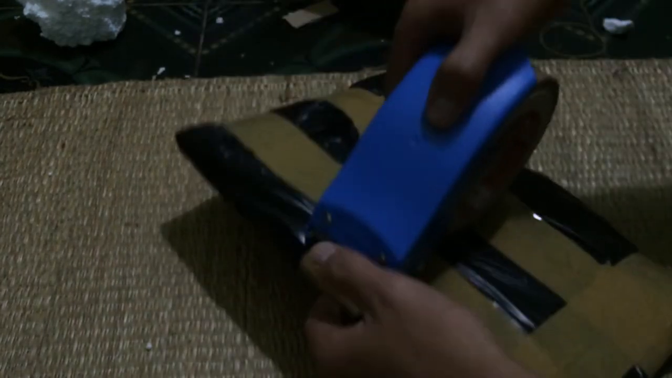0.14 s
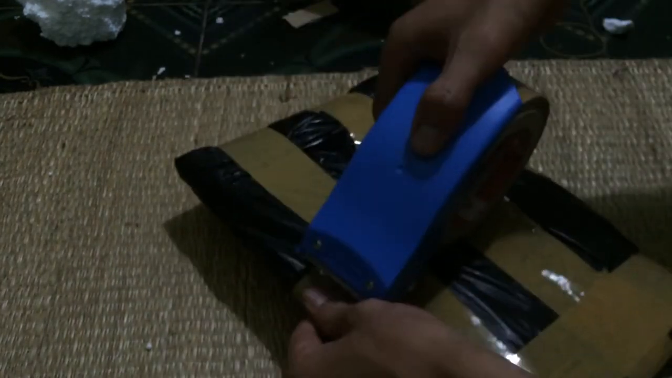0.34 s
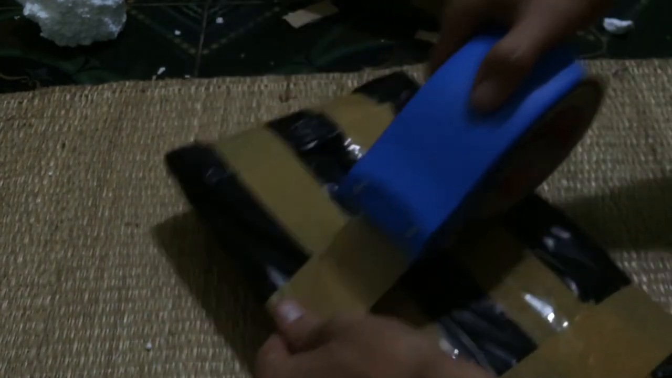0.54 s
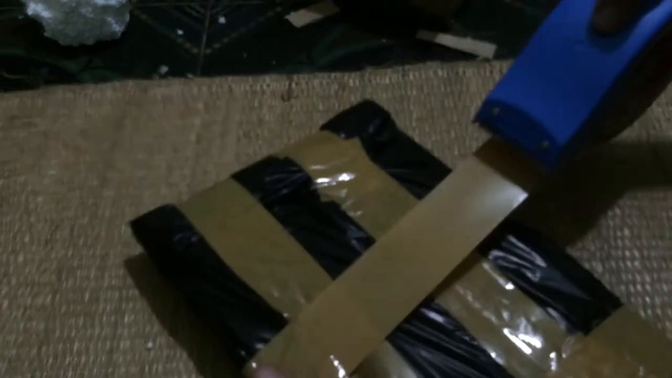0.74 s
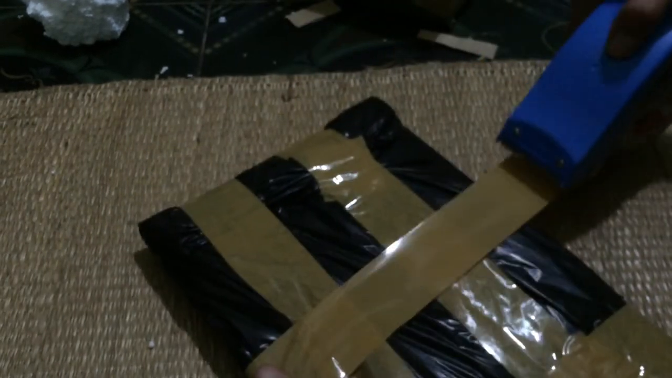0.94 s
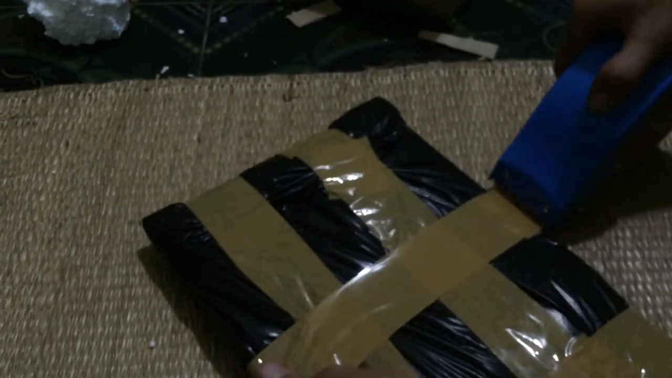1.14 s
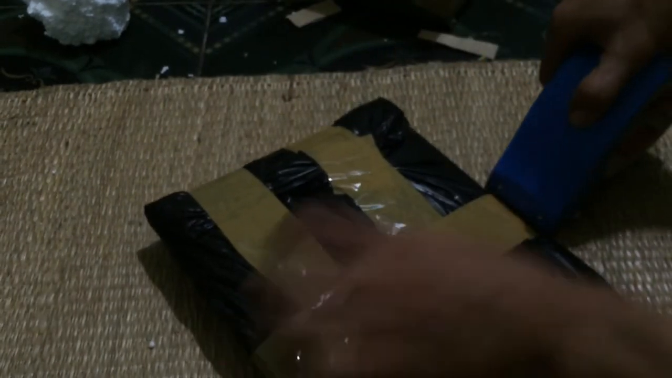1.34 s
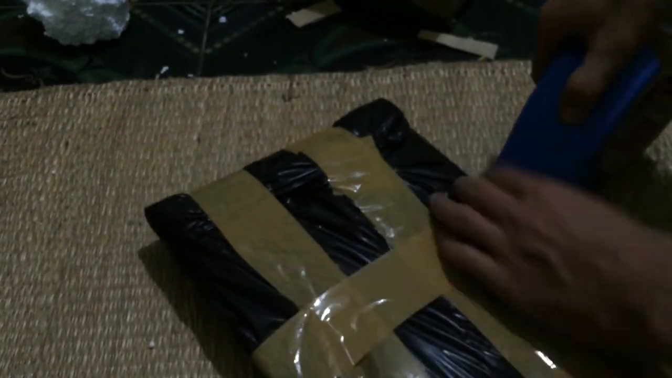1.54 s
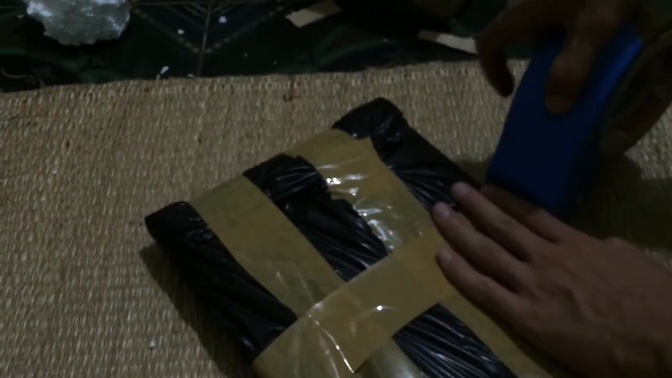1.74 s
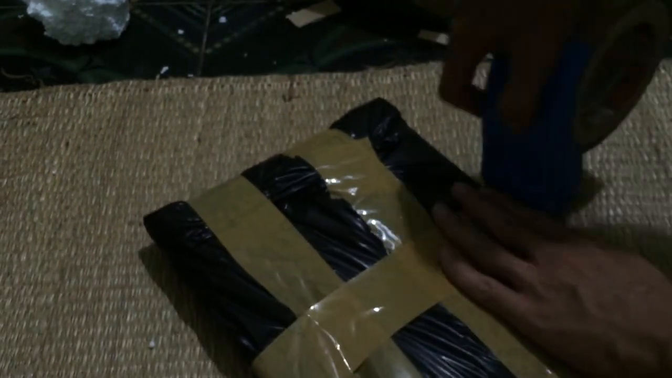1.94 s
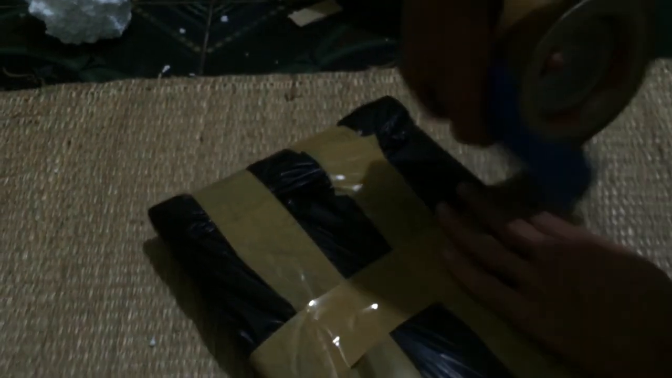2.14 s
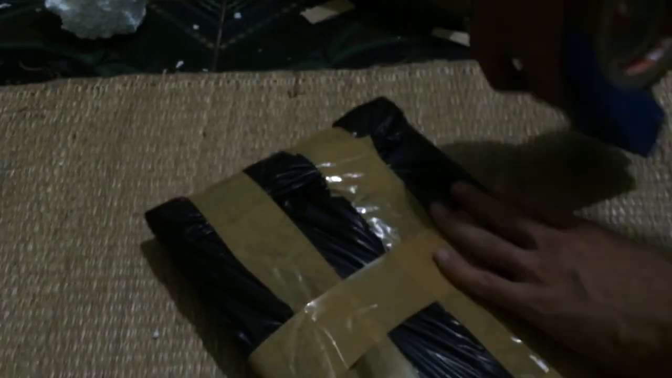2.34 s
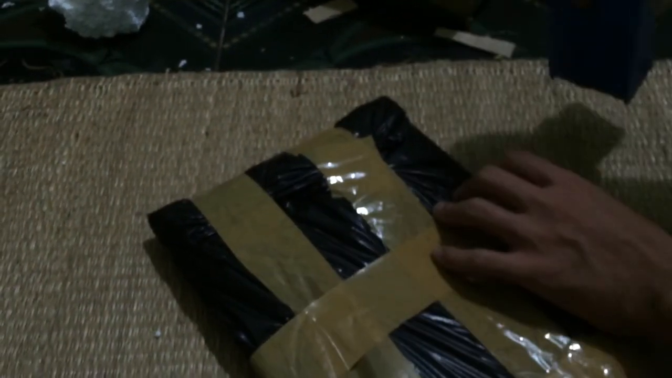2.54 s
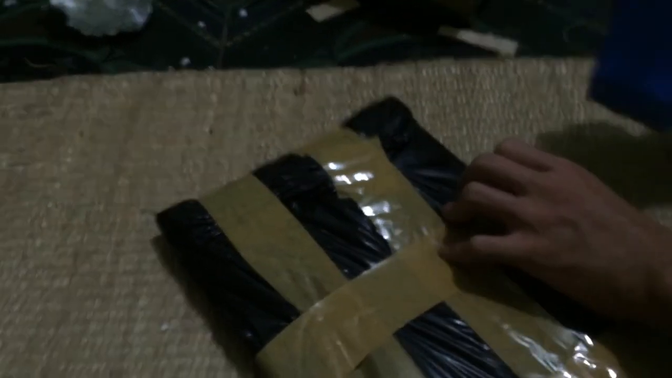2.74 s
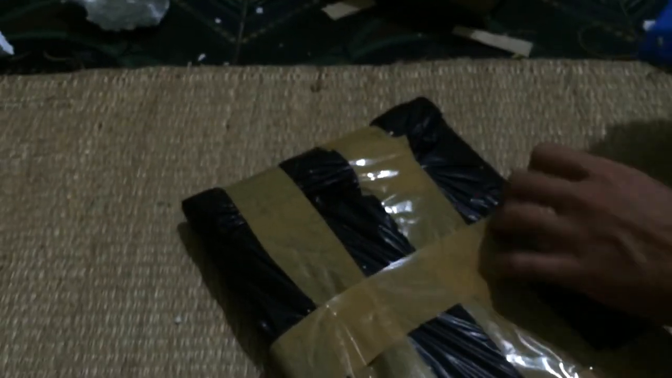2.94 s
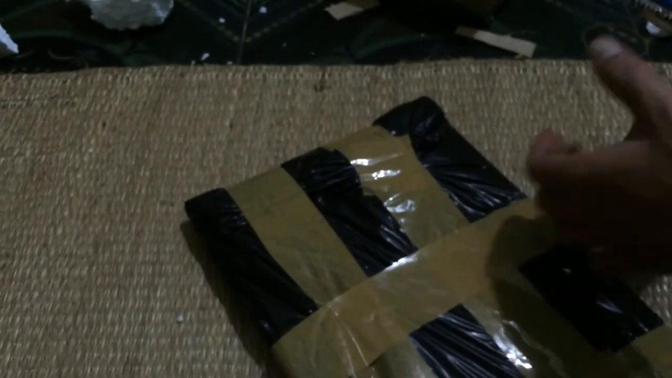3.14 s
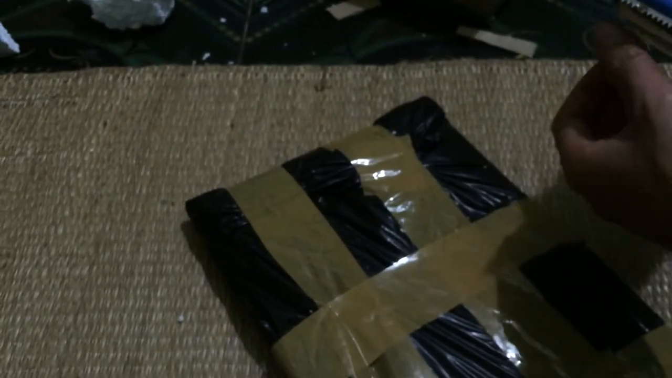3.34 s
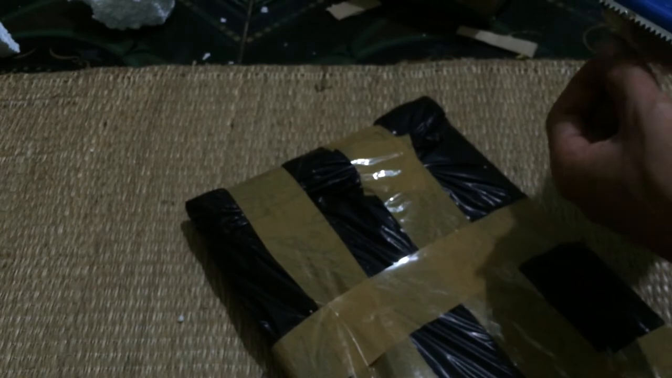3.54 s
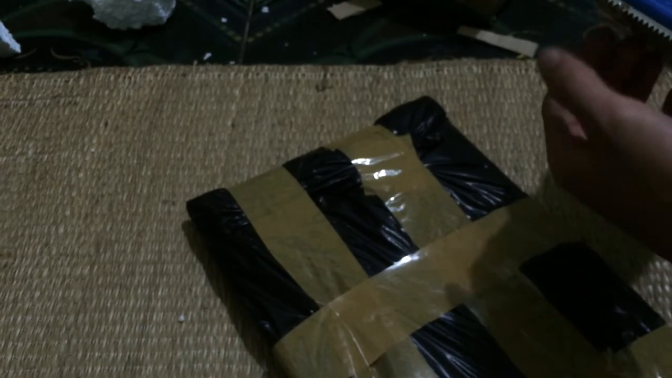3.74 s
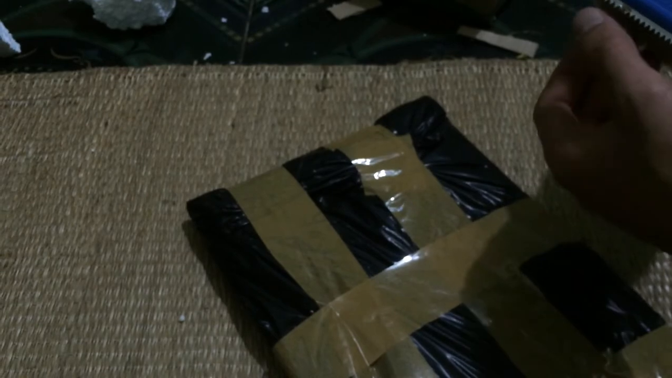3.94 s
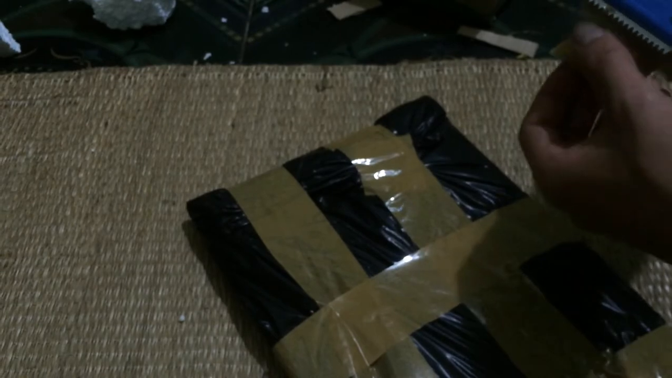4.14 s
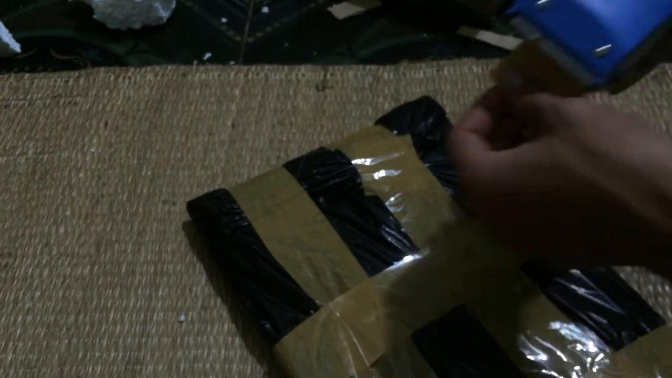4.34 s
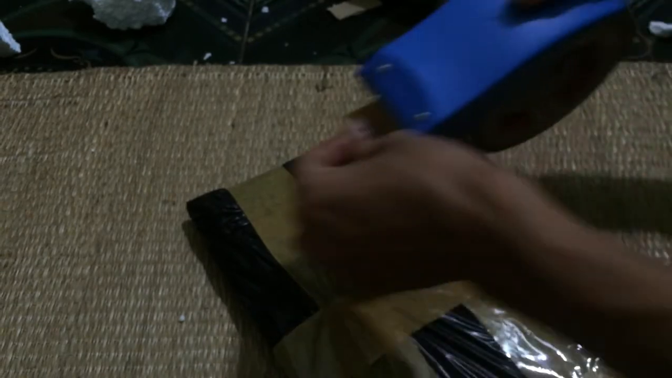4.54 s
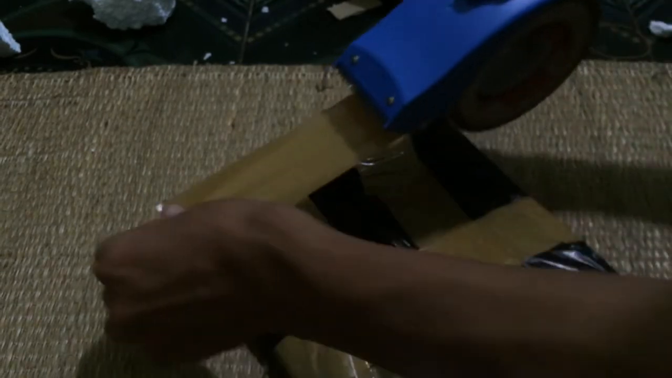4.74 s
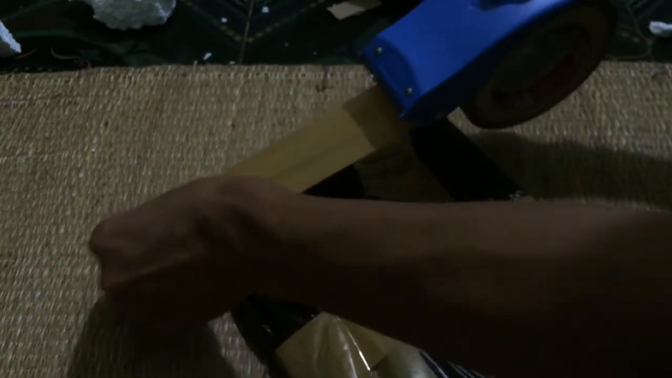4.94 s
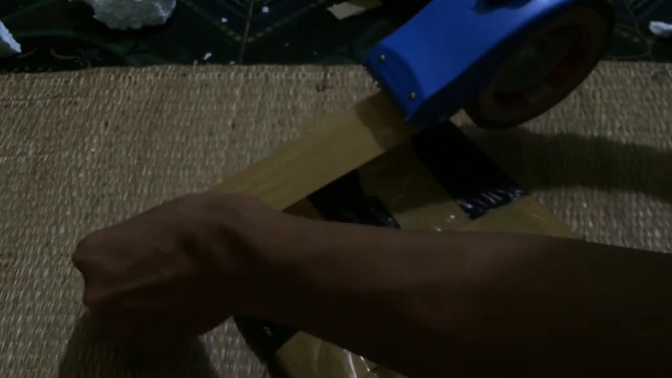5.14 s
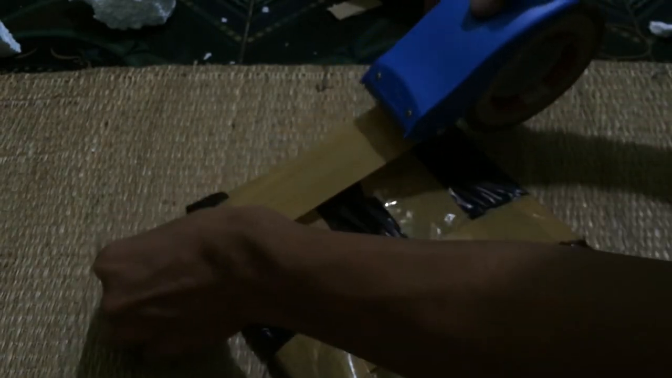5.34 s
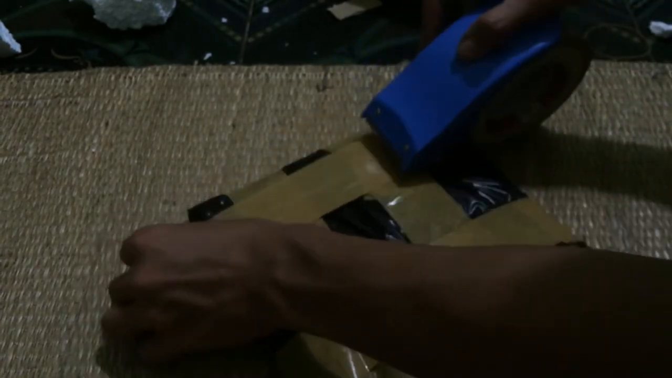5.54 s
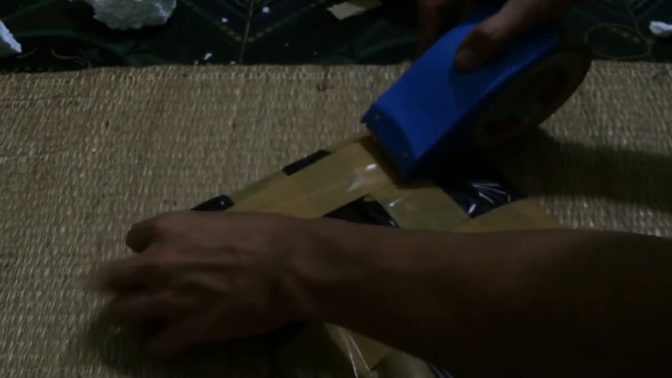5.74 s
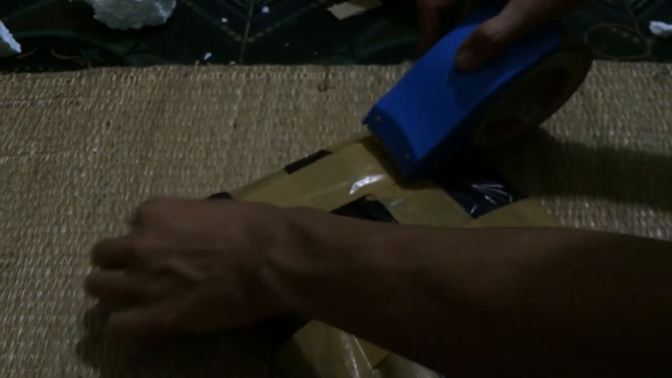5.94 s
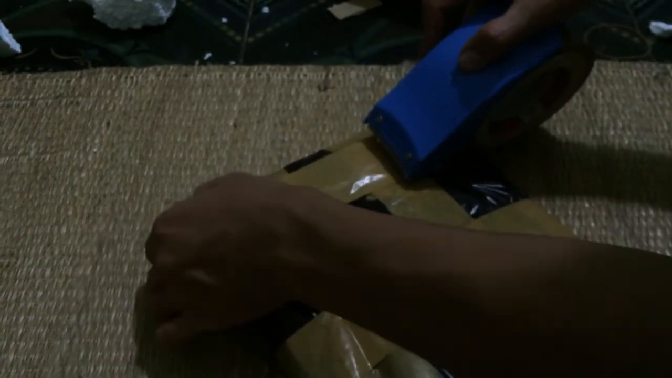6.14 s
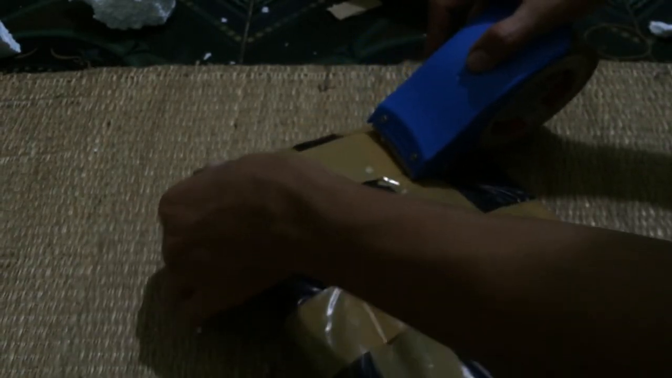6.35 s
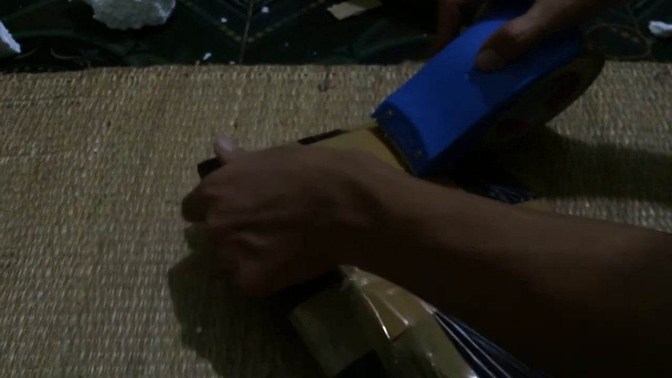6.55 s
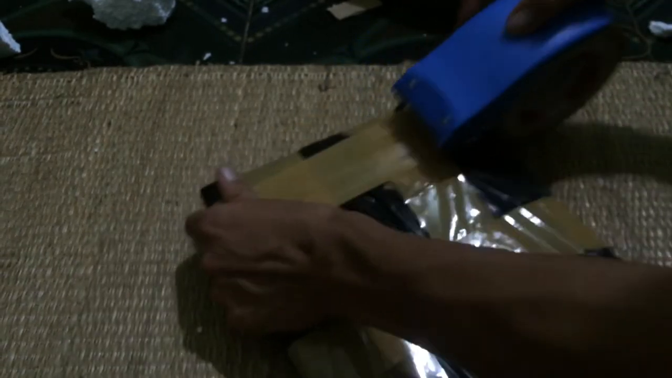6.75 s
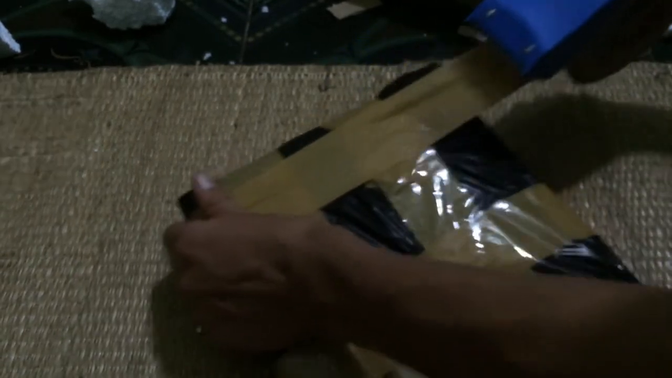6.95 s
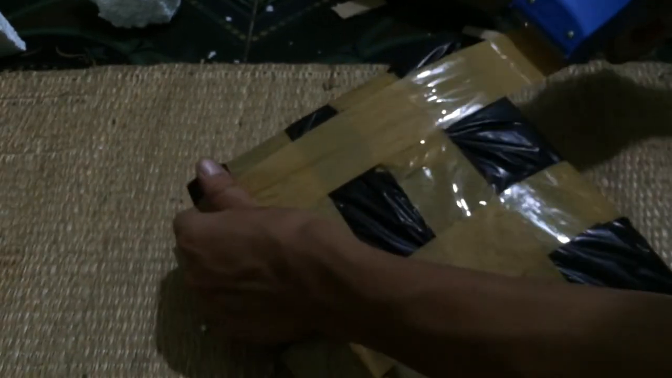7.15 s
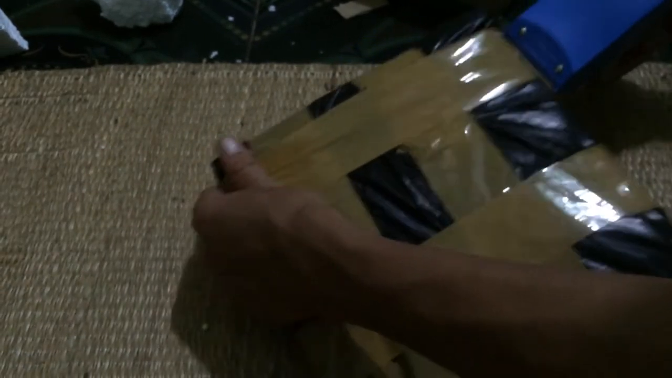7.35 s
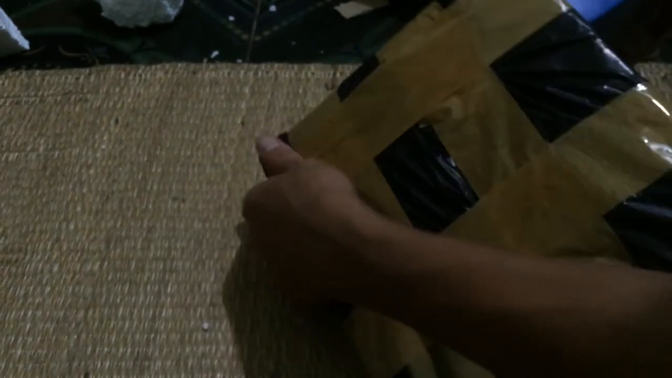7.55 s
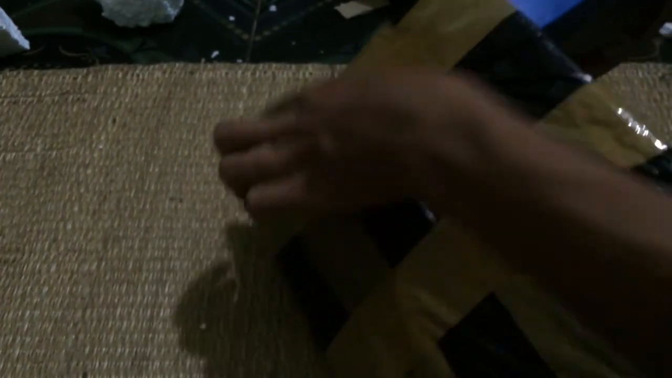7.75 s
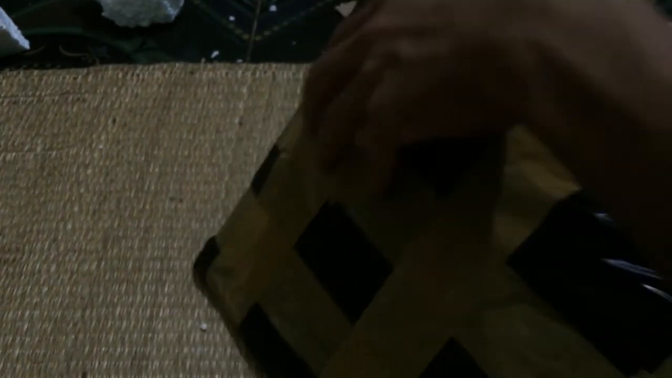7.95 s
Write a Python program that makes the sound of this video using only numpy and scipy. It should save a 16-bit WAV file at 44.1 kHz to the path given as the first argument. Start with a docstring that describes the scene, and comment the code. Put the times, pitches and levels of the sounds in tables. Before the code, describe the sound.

Packing tape is pulled off a hand dispenser with a short, loud screech that falls in pitch. The blade tears it with a few crisp clicks, and hands press a plastic-wrapped parcel, making soft crackles. A second pull stutters, with two low thumps, followed by more crinkling and a third screech near the end. The sound is close, in a bare room with a light echo.

```python
"""Packing tape screeches off a hand dispenser in three pulls, onto a plastic-wrapped parcel on a straw mat.
The glue lets go in stick-slip jerks that ring the stretched strip, lower as it grows longer.
After the first pull the blade tears the tape through. Between pulls hands press and shift the
crackling parcel. A bare room answers; one close microphone hears it all, with a few low thumps."""
import sys
import numpy as np
from scipy import signal
from scipy.io import wavfile
from scipy.ndimage import uniform_filter1d, minimum_filter1d

SR = 44100
rng = np.random.default_rng(int(sys.argv[2]) if len(sys.argv) > 2 else 0)


def int16_out(signal):
    """Quantize to a 16-bit WAV file."""
    q = np.round(np.clip(np.atleast_2d(signal).T, -1, 1) * 32767)
    wavfile.write(sys.argv[1], SR, q.astype(np.int16))


N = 351918

# Long pulls: start_s, fastest_s, end_s, start_speed_ratio, level_db, rasp_share_db, top_slips_per_s,
# first_ring_hz, last_ring_hz, glide_exponent
PULLS = [(0.551, 0.687, 0.883, 0.97, -12.5, -2.5, 400, 1153, 700, 0.4),
         (4.674, 4.785, 4.872, 0.78, -10, -0.5, 430, 1150, 845, 1.0),
         (6.926, 7.036, 7.105, 0.92, -11, -5, 310, 1260, 700, 1.27)]
# Stutters around the pulls: start_s, slip_count, gap_s, level_db, ring_hz, rasp_share_db
JERKS = [(0.493, 4, .0062, -3.5, 1050, -4), (0.52, 4, .0073, 3, 1120, -3), (4.63, 2, .003, 1, 1230, -2),
         (4.653, 4, .0037, 6, 1200, -1.5), (4.894, 2, .004, -1.5, 930, -2), (5.0079, 1, 0, 0, 1110, -1.5),
         (5.0402, 2, .0068, -1.5, 978, -3.5), (5.076, 1, 0, 3.5, 1050, 1.5), (5.102, 1, 0, 0, 877, -12.5),
         (5.1386, 1, 0, 0.5, 940, -5), (6.7806, 2, .003, -3, 1100, -1.5), (6.853, 4, .0056, -4.5, 1190, -6),
         (6.896, 3, .0057, -3.5, 1090, -7), (7.1, 4, .0108, -7, 794, -11.5)]
# Glue rasp spectra, one per pull: freq_hz, gain_db
GLUE_1 = [(1200, -9), (1900, 1), (2500, -1), (3300, -1), (4000, 0), (5400, 0), (6500, -3), (8000, -6),
          (10000, -9), (12000, -12), (15300, -13)]
GLUE_2 = [(1200, -16), (1850, -5), (2200, 0), (2800, -6), (3300, 3), (3700, -3), (4500, 1), (5600, -1),
          (6500, -5), (8000, -8), (9300, -9), (11000, -7), (15300, -11)]
GLUE_3 = [(1200, -4), (1800, 1), (2500, 2), (2900, -2), (3350, 0), (3700, -3), (4800, -1), (6200, -4),
          (7600, -4), (8600, -10), (11000, -11), (15300, -14)]


def peeling(thump_db=-37):
    """Three pulls, with stuttering jerks that each carry a faint low thump."""
    out = np.zeros(N)
    add(out, *pull(PULLS[0], GLUE_1, slip_s=.002, click=4.2, jitter=.2, uneven_db=1.0,
                   squeal=2.0, squeal_from_hz=5100, squeal_to_hz=2850, low_db=-23))
    add(out, *pull(PULLS[1], GLUE_2, slip_s=.0024, click=4.9, jitter=.2, uneven_db=2.5,
                   squeal=0.55, squeal_from_hz=4200, squeal_to_hz=3000, low_db=-23.5))
    add(out, *pull(PULLS[2], GLUE_3, slip_s=.0016, click=8.4, jitter=.18, uneven_db=1.0,
                   squeal=0.59, squeal_from_hz=3500, squeal_to_hz=2210, low_db=-22.5))
    for start_s, slip_count, gap_s, level_db, ring_hz, rasp_share_db in JERKS:
        nearest_pull = np.argmin([abs(start_s - row[0]) for row in PULLS])
        glue = (GLUE_1, GLUE_2, GLUE_3)[nearest_pull]
        add(out, start_s, amp(level_db + thump_db) * thump())
        for k in range(round(slip_count)):
            add(out, start_s + k * gap_s, amp(level_db) * jerk(ring_hz, rasp_share_db, glue))
    return out


# High strip modes: freq_ratio, width_hz, gain_db
SQUEAL_MODES = [(1, 258.5, -2), (1.36, 319, -9.5)]


def pull(row, glue, slip_s, click, jitter, uneven_db, squeal, squeal_from_hz, squeal_to_hz, low_db):
    """Glue slips drive the strip: louder, denser, brighter with speed; modes sink as it lengthens."""
    start_s, fastest_s, end_s, start_speed, level_db, rasp_share_db, top_rate, *ring_glide = row
    t = np.arange(start_s, end_s, 1 / SR)
    speed = hand_speed(t, start_s, fastest_s, end_s, start_speed)
    drawn = np.cumsum(speed) / speed.sum()
    first_hz, last_hz, exponent = ring_glide
    ring_hz = glide(drawn ** exponent, first_hz, last_hz)
    low_hz = glide(drawn ** exponent, from_hz=785, to_hz=215)  # lowest lengthwise mode
    squeal_hz = glide(drawn, squeal_from_hz, squeal_to_hz) * tension_waver(t)
    slips = stick_slip(top_rate * speed ** 0.6, jitter, uneven_db)
    spray = decay(slips, slip_s) * rng.standard_normal(N)[:len(t)]
    drive = spray + click * slips
    squealing = sum(amp(db) * resonate(drive, ratio * squeal_hz, width_hz)
                    for ratio, width_hz, db in SQUEAL_MODES)
    rasp = high_pass(colour(drive + squeal * squealing, glue), hz=1100)
    low = high_pass(resonate_twice(drive, low_hz, 280, 380), hz=171)
    ring, rasp, low = (x / envelope(x, samples=900) for x in (strip(drive, ring_hz), rasp, low))
    brightening_db = 0.52 * 20 * np.log10(speed)
    screech = blend(ring, rasp, rasp_share_db + brightening_db) + amp(low_db) * low
    return start_s, amp(level_db) * speed * screech * signal.windows.tukey(len(t), .01)


def hand_speed(t, start_s, fastest_s, end_s, start_speed, end_speed=0.36):
    """Share of full speed: the hand accelerates, then brakes until the tape sticks."""
    rise = np.sin(np.pi / 2 * np.clip((t - start_s) / (fastest_s - start_s), 0, 1))
    fall = np.cos(np.pi / 2 * np.clip((t - fastest_s) / (end_s - fastest_s), 0, 1)) ** 2.3
    return (start_speed + (1 - start_speed) * rise) * (end_speed + (1 - end_speed) * fall)


def stick_slip(slips_per_s, jitter, uneven_db):
    """One impulse each time the glue lets go, uneven in spacing and size."""
    n = len(slips_per_s)
    gap_noise, size_noise = rng.standard_normal((200, 2)).T
    gaps = np.exp(jitter * gap_noise)
    onsets = np.searchsorted(np.cumsum(slips_per_s) / SR, np.cumsum(gaps) - gaps[0])
    return np.bincount(onsets, amp(uneven_db * size_noise), n + 1)[:n]


def tension_waver(t, depth=0.03, step_s=0.0073):
    """Pitch factor near 1 from unsteady tension."""
    steps = rng.standard_normal(200)
    return 1 + depth * np.interp(t - t[0], step_s * np.arange(len(steps)), steps)


def jerk(ring_hz, rasp_share_db, glue):
    """A single slip rings the strip and rasps."""
    drive = burst(decay_s=0.0026, click=6.3, scatter_db=-25)
    rasp = high_pass(colour(drive, glue), hz=1060)
    return blend(unit_hit(strip(drive, ring_hz)), unit_hit(rasp), rasp_share_db)


# Stretched strip modes: freq_ratio, width_hz, gain_db
STRIP_MODES = [(1, 406, 0), (1.402, 509, -9)]
# Dispenser and roll modes: freq_hz, width_hz, gain_db
DISPENSER_MODES = [(768, 6.1, -9), (958, 25, 6), (1121, 125, 1), (1382, 130, -2), (1503, 320, -0.5),
                   (2405, 510, -12.5), (3080, 360, -12)]


def strip(drive, ring_hz, shell_db=-2):
    """The taut strip rings like a drumskin and shakes the dispenser; its lows are cut away."""
    skin = sum(amp(db) * resonate_twice(drive, ratio * ring_hz, width_hz, width_hz)
               for ratio, width_hz, db in STRIP_MODES)
    shell = sum(amp(db) * resonate(drive, hz, width_hz) for hz, width_hz, db in DISPENSER_MODES)
    return high_pass(skin + amp(shell_db) * shell, hz=576)


# Blade bites: start_s, length_s, level_db
TEARS = [(1.729, .002, -13.5), (1.742, .008, -11.5), (1.764, .002, -14.5), (1.774, .013, -17.5),
         (2.099, .002, -17.5), (2.153, .002, -10.5), (2.172, .002, -7), (2.191, .005, -10.5),
         (2.196, .008, -0.5)]
# Splitting tape spectrum: freq_hz, gain_db
TEAR_SPECTRUM = [(71, -85), (120, -24), (176, -12.5), (249, -24.5), (645, -8.5), (987, -7), (1090, -9.5),
                 (1420, -3.5), (1570, -13.5), (2000, -5), (2660, -11), (4330, -4.5), (4990, -7),
                 (8110, -6.5), (15200, -15.5)]


def cutting(tooth_gap_s=.0035):
    """The tape splits tooth by tooth in short runs; the blade rings faintly."""
    out = np.zeros(N)
    for start_s, length_s, level_db in TEARS:
        for delay_s in np.arange(0, length_s, tooth_gap_s):
            split = colour(burst(decay_s=0.0021, click=0.96, scatter_db=-14.5), TEAR_SPECTRUM)
            add(out, start_s + delay_s, amp(level_db) * unit_hit(split))
    return out + amp(3) * resonate(out, hz=1490, width_hz=5)


# Dull taps on the taut tape: start_s, level_db, ring_hz
PLUCKS = [(0.252, -20, 1210), (0.327, -19.5, 1250), (0.418, -18.5, 1190), (2.492, -28, 910),
          (4.306, -34, 1520), (4.476, -25, 1345), (4.604, -33.5, 1320), (6.312, -25.5, 1360),
          (6.614, -29.5, 1220), (6.711, -31.5, 1520)]


def plucks():
    """Fingers twang the strip without peeling it."""
    out = np.zeros(N)
    for start_s, level_db, ring_hz in PLUCKS:
        drive = high_pass(burst(decay_s=0.0057, click=21.0, scatter_db=-5), hz=613)
        add(out, start_s, amp(level_db) * unit_hit(resonate_twice(drive, ring_hz, 450, 1100)))
    return out


# Clear snaps: creases flipping in the plastic, and between 3.6 and 4.3 s fingers picking at the tape end:
# start_s, level_db, edge_share_db, knock_hz
SNAPS = [(0.044, -30, -10, 900), (1.594, -28.5, -1.5, 1630), (2.786, -31.5, -7, 2130),
         (2.875, -33.5, -17, 635), (2.948, -27, -2.5, 914), (3.051, -33.5, 2, 1570),
         (3.156, -37, -0.5, 2020), (3.378, -39, -1, 1880), (3.604, -31.5, -0.5, 1480),
         (3.763, -47.5, -5.5, 730), (3.827, -39.5, -2, 1520), (3.961, -35.5, -1.5, 1520),
         (4.105, -37, 3, 1510), (4.24, -31, -1, 1280), (4.302, -28, -1.5, 1450), (4.396, -22, -1, 2160),
         (4.445, -16, -0.5, 1460), (5.844, -20, 0, 1050), (5.858, -19, -0.5, 590),
         (5.937, -19.5, -11, 1220), (6.013, -32, 9, 1090), (6.073, -32, 6, 1260), (6.151, -31, -2, 1215),
         (6.184, -26.5, -0.5, 1780), (6.21, -17.5, -2, 1380), (6.332, -27.5, -5.5, 1480),
         (6.481, -28.5, 0, 1420), (7.564, -26.5, -2.5, 1793), (7.689, -29, -8, 1540),
         (7.851, -31.5, -17, 1630), (7.897, -31.5, -16, 1410)]
# Hand strokes on the parcel, and the tape creaking as it stretches just before each pull (0.466, 4.593, 6.745
# s): start_s, end_s, rustle_db
RUBS = [(0.0, 0.463, -53), (0.056, 0.13, -48), (0.466, 0.493, -39), (1.134, 1.314, -50),
        (1.589, 1.699, -51.5), (1.712, 1.789, -42.5), (2.072, 2.186, -45), (2.562, 3.069, -55.5),
        (3.085, 3.3, -66.5), (4.076, 4.146, -62), (4.33, 4.586, -59.5), (4.593, 4.63, -37.5),
        (5.514, 5.585, -49.5), (5.75, 5.899, -52.5), (6.185, 6.538, -52.5), (6.681, 6.749, -48),
        (6.745, 6.784, -30), (7.496, 7.916, -49)]


def wrapping(strays_per_s=14, stray_over_rustle_db=16.5):
    """Handled plastic and tape end: clear snaps, plus stray snaps and rustle wherever a hand rubs or the tape
    creaks just before a pull."""
    out = np.zeros(N)
    for start_s, level_db, edge_share_db, knock_hz in SNAPS:
        add(out, start_s, amp(level_db) * crease(edge_share_db, knock_hz))
    for start_s, end_s, rustle_db in RUBS:
        length_s = end_s - start_s
        for when, size, pitch, dullness in rng.random((int(length_s * strays_per_s), 4)):
            snap = crease(edge_share_db=-10.5 * dullness, knock_hz=np.interp(pitch, [0, 1], [550, 2130]))
            level_db = rustle_db + stray_over_rustle_db + size - 0.25
            add(out, start_s + when * length_s, amp(level_db) * snap)
    return out + rustle(RUBS)


# Snap body and edge spectra: freq_hz, gain_db
BODY_SPECTRUM = [(60, -20), (250, -8.5), (600, -3), (1450, -2), (2500, -2), (5000, -16.5), (15000, -42)]
EDGE_SPECTRUM = [(200, -17), (1500, -15.5), (4000, 0.5), (8000, -2.5), (12000, -5.5), (15500, -10)]


def crease(edge_share_db, knock_hz, knock_db=4, neighbour_db=-14.5):
    """A crease flips or a finger picks at the tape end: sharp edge over a hollow knock of the parcel. Three
    neighbours follow."""
    body = colour(burst(decay_s=0.009, click=2.9, scatter_db=-13.5), BODY_SPECTRUM)
    body = unit_hit(body + amp(knock_db) * resonate(body, knock_hz, width_hz=240))
    edge = unit_hit(colour(burst(decay_s=0.0011, click=0.95, scatter_db=-10.0), EDGE_SPECTRUM))
    snap = blend(body, edge, edge_share_db)
    out = snap.copy()
    for lag, size in rng.random((3, 2)):
        add(out, 0.0012 + 0.01 * lag, amp(neighbour_db) * size * snap)
    return out


# Rubbed plastic spectrum: freq_hz, gain_db
RUSTLE_SPECTRUM = [(47, -43), (80, -12), (151, -21.5), (197, 3.5), (240, -18.5), (434, -3.5), (484, -12.5),
                   (658, -4), (1620, -0.5), (1770, -2), (3980, -4.5), (15200, -13)]


def rustle(rubs, grains_per_s=900, spread_db=-2.0, grain_s=0.0012, hiss=0.28):
    """Skin and mat rub the plastic, or the stretching tape creaks: tiny crackles over a soft hiss."""
    t = np.arange(N) / SR
    attack_s, release_s = 0.0089, 0.05
    level = np.zeros(N)
    for start_s, end_s, rustle_db in rubs:
        attack = np.clip((t - start_s) / attack_s, 0, 1)
        release = np.exp(-np.maximum(t - end_s, 0) / release_s)
        level += amp(rustle_db) * attack * release
    sizes = amp(spread_db * np.minimum(rng.exponential(1, N), 5))
    onsets = rng.random(N) < grains_per_s / SR
    grains = unit_rms(decay(sizes * onsets, grain_s))
    return level * unit_rms(colour((grains + hiss) * rng.standard_normal(N), RUSTLE_SPECTRUM))


# Low thumps: start_s, level_db
THUMPS = [(0.065, -28.5), (1.784, -30), (2.199, -33), (4.824, -2.5), (4.86, -1), (5.859, -34),
          (7.642, -35.5)]


def thumps():
    """Short, dull puffs of air or bumps on the microphone."""
    out = np.zeros(N)
    for start_s, level_db in THUMPS:
        add(out, start_s, amp(level_db) * thump())
    return out


# Low thump spectrum: freq_hz, gain_db
THUMP_SPECTRUM = [(20, -4.5), (50, -5), (90, 1.5), (170, -4), (300, -13), (550, -9.5), (1000, -36),
                  (4000, -46)]


def thump():
    """One short, dull, low pulse."""
    return unit_hit(colour(burst(decay_s=0.0081, click=68.0, scatter_db=-34.0), THUMP_SPECTRUM))


# Room decay: freq_hz, t60_s
ROOM_DECAY = [(100, 0.62), (180, 1.6), (300, 1.27), (1000, 1.077), (2500, 0.97), (5000, 0.77), (9000, 0.72),
              (15000, 0.55)]
# Reflection spectrum: freq_hz, gain_db
ROOM_SPECTRUM = [(60, -18.5), (175, 4), (300, 0.5), (500, 0), (900, 2), (1600, 5), (3500, 0.5),
                 (8000, -1.5), (15000, -1.5)]


def room(x, build_s=0.0051, tail_s=1.4):
    """Dense reflections build up and die away, treble first."""
    hz, t, noise = signal.stft(rng.standard_normal(int(tail_s * SR)), SR, nperseg=256)
    level_db = value_at(ROOM_SPECTRUM, hz)[:, None] - 60 * t / value_at(ROOM_DECAY, hz)[:, None]
    build_up = 1 - np.exp(-t / build_s)
    tail = signal.istft(noise * amp(level_db) * build_up, SR, nperseg=256)[1]
    return signal.fftconvolve(x, tail / np.linalg.norm(tail))[:N]


# Noise floor spectrum: freq_hz, gain_db
HISS_SPECTRUM = [(18, -29), (30, -12), (66, 0), (102, -2.5), (570, -16.5), (1090, -12.5), (1700, -13),
                 (2330, -19.5), (3630, -17), (5220, -17.5), (5800, -18.5), (7140, -1.5), (8570, -20),
                 (12300, -21.5), (15200, -36)]


def background(hiss_db=-60, whine_hz=7200, whine_db=-63.5, hum_hz=55, hum_db=-72.5):
    """Faint hiss, a narrow band of high hiss and a low hum."""
    hiss = unit_rms(colour(rng.standard_normal(N), HISS_SPECTRUM))
    whine = unit_rms(resonate_twice(rng.standard_normal(N), whine_hz, 600, 600))
    hum = unit_rms(resonate_twice(rng.standard_normal(N), hum_hz, 4, 4))
    return amp(hiss_db) * hiss + amp(whine_db) * whine + amp(hum_db) * hum


def burst(decay_s, click, scatter_db):
    """A click, a spray of tiny fractures and a faint scatter from things nearby."""
    t = np.arange(2600) / SR
    spray = rng.standard_normal(len(t)) * (np.exp(-t / decay_s) + amp(scatter_db) * np.exp(-t / 0.011))
    spray[0] += click
    return spray


def resonate(x, hz, width_hz):
    """Unity-gain resonance; hz may be a curve."""
    carrier = np.exp(2j * np.pi * np.cumsum(hz * np.ones(len(x))) / SR)
    pole = np.exp(-np.pi * width_hz / SR)
    return 2 * (carrier * signal.lfilter([1 - pole], [1, -pole], x / carrier)).real


def resonate_twice(x, hz, first_width_hz, second_width_hz):
    return resonate(resonate(x, hz, first_width_hz), hz, second_width_hz)


def colour(x, spectrum):
    """Minimum-phase filter with the given spectrum."""
    hz = abs(np.fft.fftfreq(4096, 1 / SR))
    log_gain = np.log(amp(value_at(spectrum, hz)))
    taps = np.fft.ifft(np.exp(signal.hilbert(log_gain).conj())).real[:2048]
    return signal.fftconvolve(x, taps)[:len(x)]


def high_pass(x, hz):
    return signal.sosfilt(signal.butter(2, hz, "high", fs=SR, output="sos"), x)


def decay(impulses, decay_s):
    return signal.lfilter([1], [1, -np.exp(-1 / (decay_s * SR))], impulses)


def glide(progress, from_hz, to_hz):
    return from_hz * (to_hz / from_hz) ** progress


def blend(dull, bright, bright_share_db):
    """Equal-power mix."""
    share = np.clip(amp(bright_share_db) ** 2, .03, .93)
    return np.sqrt(1 - share) * dull + np.sqrt(share) * bright


def envelope(x, samples):
    """Running rms."""
    return np.sqrt(abs(uniform_filter1d(x ** 2, samples, mode="constant")) + 1e-14)


def unit_hit(x):
    """Peak near 1, taken as three times the loudest 4 ms rms."""
    return x / (3 * envelope(x, samples=176).max())


def unit_rms(x):
    return x / np.sqrt(np.mean(x ** 2) + 1e-20)


def amp(db):
    return 10 ** (np.asarray(db) / 20)


def value_at(points, hz):
    freq_hz, values = np.transpose(points)
    return np.interp(np.log(hz + 1), np.log(freq_hz + 1), values)


def add(mix, start_s, sound):
    part = mix[max(round(start_s * SR), 0):][:len(sound)]
    part += sound[:len(part)]


def scene():
    """Tape, blade and wrapping stir the room; plucks and thumps stay dry. Mono on two channels."""
    tape, blade, plastic = peeling(), cutting(), wrapping()
    echo = room(amp(-14.0) * tape + amp(-13.5) * blade + amp(-15) * plastic)
    mono = tape + blade + plastic + plucks() + thumps() + echo + background()
    return np.array([mono, mono])


def record(dry, cutoff_hz=15450):
    """Fast limiter at full scale, then a steep low-pass."""
    gain = 1 / np.maximum(abs(dry).max(0), 1)
    limited = dry * uniform_filter1d(minimum_filter1d(gain, size=61), size=61)
    low_pass = signal.firwin(601, cutoff_hz, window=("kaiser", 8), fs=SR)
    return signal.oaconvolve(limited, low_pass[None], "same")


dry = scene()
out = record(dry)
int16_out(out)
```